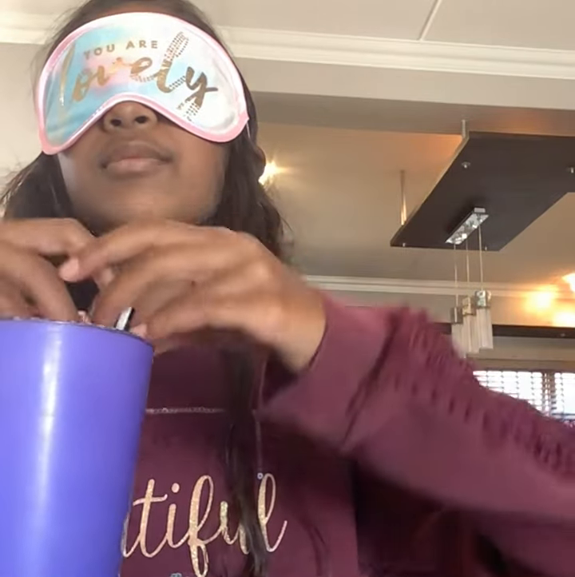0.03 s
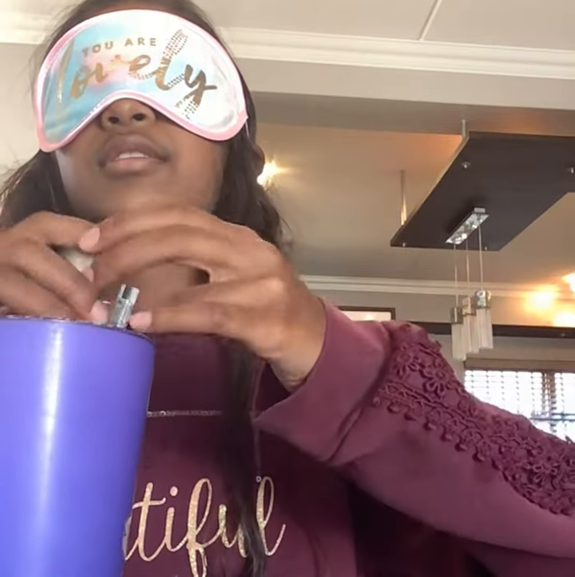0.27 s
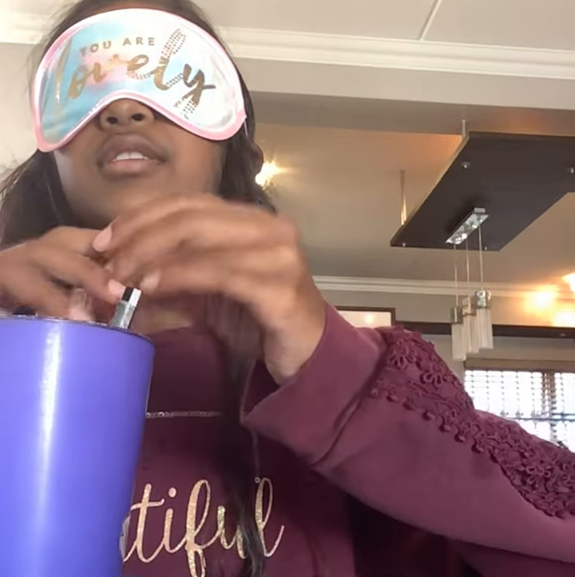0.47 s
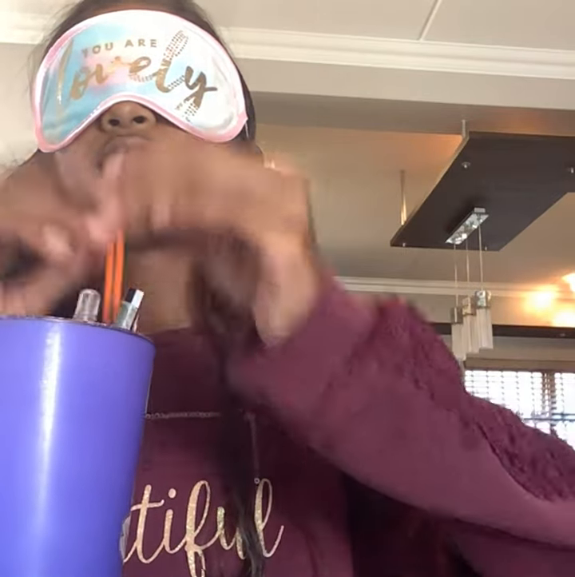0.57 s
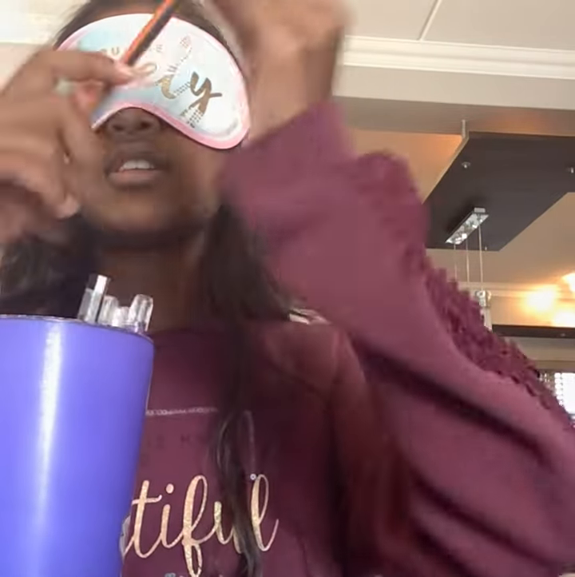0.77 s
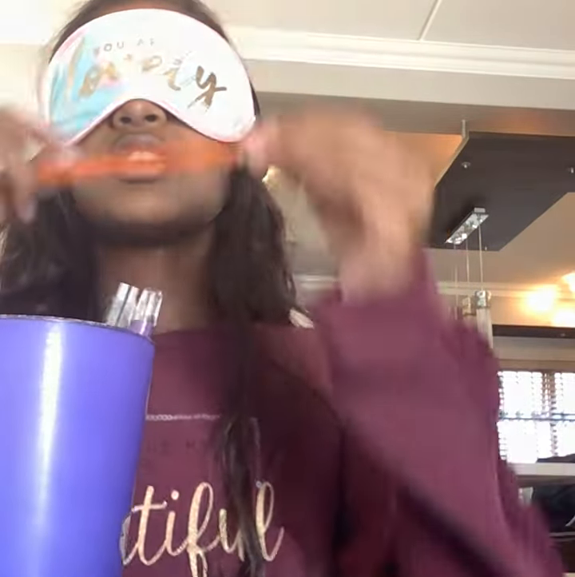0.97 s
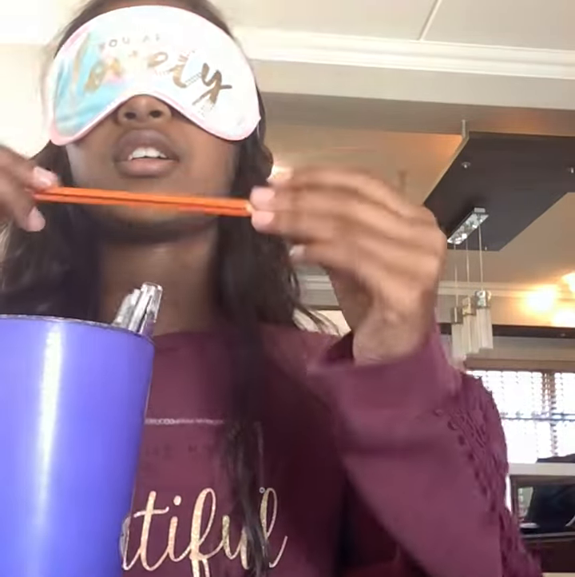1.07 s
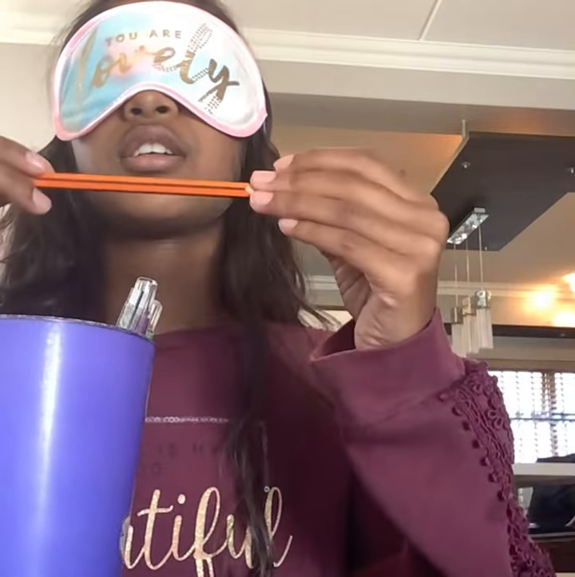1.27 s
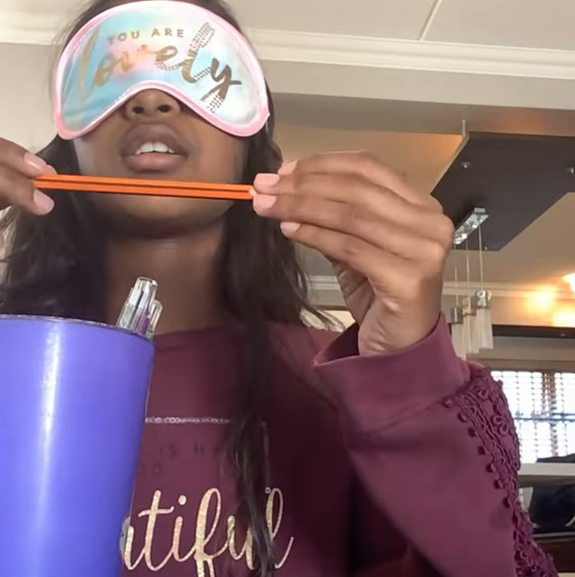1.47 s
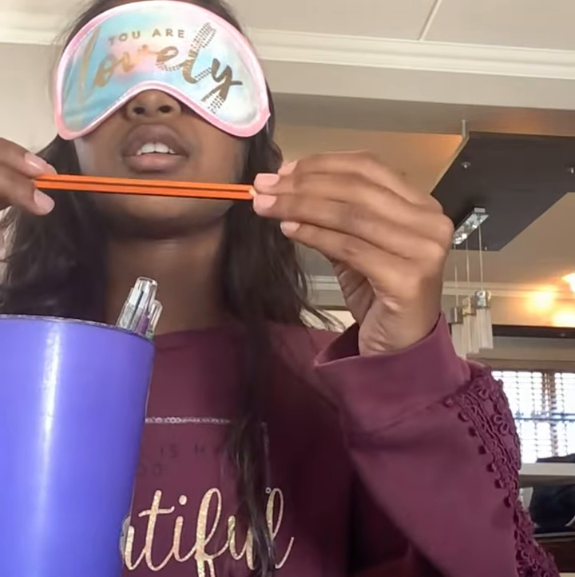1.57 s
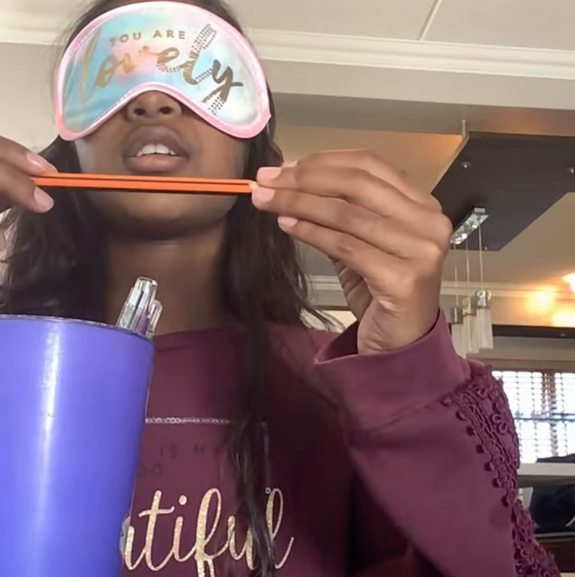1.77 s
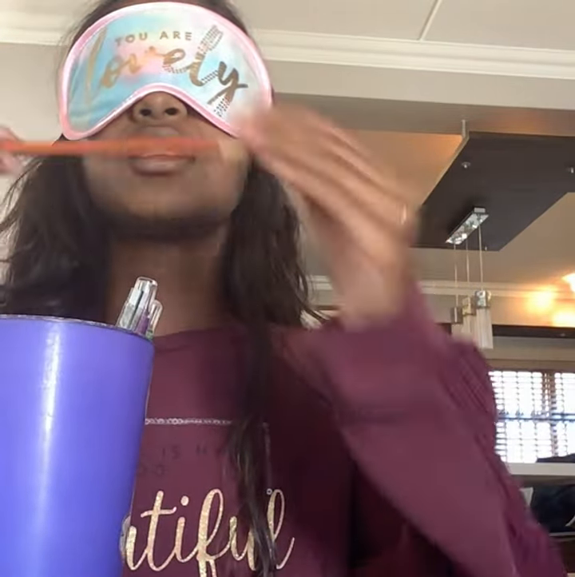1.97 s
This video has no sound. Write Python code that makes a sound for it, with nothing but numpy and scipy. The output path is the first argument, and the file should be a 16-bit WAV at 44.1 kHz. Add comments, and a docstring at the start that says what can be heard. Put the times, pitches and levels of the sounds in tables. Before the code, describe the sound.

Pens and pencils rattle in a plastic cup near the microphone, their bright clicks mixed with hollow knocks and a soft rustle of hand and sleeve. After a tiny squeak, pencils slide out along their neighbours in the loudest part of the clatter. The remaining pens settle with a couple of light ticks, and the room goes quiet apart from a small motor humming faintly.

```python
"""Pencils and pens click together as a hand picks pencils out of a plastic cup, close by in a living room.
The barrels ring in bending modes, slide and squeak on each other; two last ticks follow as they settle.
Their ends knock the cup, whose hollow booms and whose wall clatters; barrels tap its stiff rim.
Hand and arm rustle softly, and a small motor hums somewhere in the room."""
import sys
import numpy as np
from scipy import signal
from scipy.fft import rfft, irfft, next_fast_len
from scipy.io import wavfile
from scipy.ndimage import map_coordinates

SR = 44100
rng = np.random.default_rng(int(sys.argv[2]) if len(sys.argv) > 2 else 0)


def store_wav(level_fs):
    """Save 16-bit WAV to argv[1]."""
    pcm = np.round(np.clip(np.atleast_2d(level_fs), -1, 1) * 32767)
    wavfile.write(sys.argv[1], SR, pcm.T.astype(np.int16))


N = 88508

# Levels in the tables are relative.
# barrel on barrel: start_s, low_db, mid_db, high_db, favoured_hz
BARREL_CLICKS = [(0.046, -79, -52, -66, 5050), (.059, -42, -40.5, -69, 3645),
                 (0.0675, -48.5, -43.5, -54, 3645), (0.0802, -41, -43.5, -53.5, 5800),
                 (0.146, -44, -46, -56.5, 5160), (0.174, -45, -49.5, -58.5, 2510),
                 (0.184, -55, -42.5, -42, 8680), (0.2308, -63.5, -55.5, -62, 4160),
                 (0.2476, -60, -41, -47, 4160), (.2556, -55.5, -45.5, -44, 8770),
                 (0.3299, -34.5, -30.5, -33, 4380), (0.348, -33, -30.5, -39, 1685),
                 (0.38, -41.5, -46.5, -52, 6362), (.403, -57.5, -40.5, -48.5, 5150),
                 (0.4825, -37.5, -33.5, -41, 5230), (0.4892, -35.5, -20, -30.5, 4900),
                 (0.5812, -27.5, -20, -27, 3645), (.611, -39, -43, -38, 3400),
                 (0.6396, -43.5, -41.5, -45.5, 1660), (0.6919, -34, -31.5, -38, 3180),
                 (.699, -51, -36.5, -41.5, 3100), (1.092, -63, -76, -90, 3400),
                 (1.126, -59, -47, -59, 4750), (1.17, -46.5, -44.5, -58.5, 4100)]
# barrel bending modes: pitch_hz, level_db, t60_s
BARREL_MODES = [(1680.4, -2, 0.097), (2515, -13, 0.041), (2724, -10, 0.048), (3136, 3, 0.063),
                (3660, 4, .06), (4120, -9.5, .04), (4597, -5.5, 0.07), (4810, -7.5, 0.018),
                (5160, -1.5, 0.035), (5790, -5.5, 0.02), (5960, -10, 0.045), (6373, -6.5, .075),
                (6670, -7.5, 0.041), (7670, -10, .043), (7944, -6.5, 0.012), (8740, -5, .037),
                (9860, -10.5, 0.039), (10830, -10.5, .05), (12030, -8.5, .017), (13250, -19, .024)]
# contact crack: freq_hz, density_db
CRACK_SPECTRUM = [(300, -30.5), (900, -7.5), (1500, -2), (2300, -9.5), (3800, 5), (5200, 9.5), (7000, -3),
                  (9000, -0.5), (12000, -10), (16000, -16.5)]
# pen ends on the cup: start_s, boom_db, boom_hz, wall_db, thump_db, rise_s
CUP_KNOCKS = [(0.043, -49, 598, -56, -58, .001), (0.0762, -26.5, 587.7, -31, -43, 0.0043),
              (.139, -35.5, 632, -30, -32, 0.0056), (.157, -38.5, 714, -40.5, -34.5, 0.0011),
              (0.181, -39.5, 330, -46.5, -41, 0.0083), (.248, -40, 595, -46.5, -46, 0.0022),
              (.323, -42.5, 559, -37.5, -47.5, 0.0013), (0.3482, -29.5, 598, -28, -39, 0.0011),
              (.357, -29, 614.5, -31, -45, 0.0034), (.373, -32.5, 579, -43, -43.5, 0.0063),
              (0.584, -26.5, 438.6, -49, -50, 0.02), (.625, -34, 623, -45, -50, 0.026),
              (.7, -37.5, 621.4, -50.5, -43.5, 0.017), (1.005, -45.5, 608, -39.5, -66, 0.034),
              (1.171, -55, 598, -53.5, -50.5, .0012)]
# cup wall and base modes: pitch_hz, level_db, t60_s
CUP_MODES = [(430, -2.5, 0.12), (710.2, -2.5, 0.14), (852, 0.5, 0.046), (975, 0, 0.045), (1134, -3, 0.042),
             (1352, -5, 0.043), (1565, -7.5, 0.021), (1710, -5, .03)]
# thump into the holding hand: freq_hz, density_db
THUMP_SPECTRUM = [(35, -47.5), (70, -15.5), (130, -1.5), (300, -3), (500, -15), (1000, -22.5),
                  (3000, -60.5)]
# barrels on the rim: start_s, level_db
RIM_TAPS = [(.146, -42), (.3486, -36), (.4895, -44), (.581, -40), (.642, -50), (.692, -35), (1.127, -57),
            (1.171, -46)]
# rim modes: pitch_hz, level_db, t60_s
RIM_MODES = [(1103, -4.5, .04), (1203.7, -4.5, .025), (1424, -5.5, .025), (1557, 4.5, .025),
             (1830, -8, 0.13), (2026, -6, 0.053)]
# pencil drawn along its neighbours: start_s, level_db, length_s
SLIDE_STROKES = [(-.02, -56, 0.027), (.14, -55, 0.16), (.32, -47.5, 0.11), (.485, -44.5, 0.31),
                 (.99, -65.5, 0.075)]
# sliding friction: freq_hz, density_db
SLIDE_SPECTRUM = [(400, -32.5), (1650, -6), (2400, -11), (3400, -7.5), (5500, 1), (9000, 3), (12000, -5.5),
                  (16000, -7.5)]
# stick-slip notes: start_s, level_db, start_hz
PENCIL_SQUEAKS = [(0.23, -46.5, 2869), (0.248, -55, 2657), (0.254, -45.5, 2950)]
# hand rummages, then takes hold: start_s, level_db, length_s
GRIP_STROKES = [(-.02, -44, 0.72), (.98, -57.5, 0.14)]
# finger and sleeve rustle: freq_hz, density_db
RUSTLE_SPECTRUM = [(25, -51), (48, -26), (70, 2), (140, 2), (260, 1), (450, -5), (700, -0.5), (1100, -15),
                   (2200, -25), (6000, -36.5)]
# arm swings up: start_s, level_db, length_s
SWING_STROKES = [(.55, -60.5, 0.575)]
# arm rumble: freq_hz, density_db
SWING_SPECTRUM = [(70, -31.5), (125, -7), (150, 3), (200, -2.5), (260, -5), (500, -42)]
# motor tones: pitch_hz, level_db
MOTOR_TONES = [(145.8, -67), (195, -83.5), (291, -72.5), (391, -78.5), (538, -87), (586, -86)]
# still air: freq_hz, density_db
AIR_SPECTRUM = [(20, -31.5), (45, -22.5), (72, 5), (110, -2), (190, 2), (300, 0), (450, -6), (700, -18.5),
                (1200, -24.5), (3000, -24.5), (6000, -26), (12000, -28.5), (16000, -35.5)]
# room decay: freq_hz, t60_s
ROOM_DECAY = [(100, 0.99), (500, 0.27), (2000, 0.37), (5000, 0.48), (9000, 0.22), (15000, 0.31)]


def barrel_clicks(detune_ratio=0.0083, detune_above_hz=7000):
    """Hard contacts: a brief crack plus ringing barrels, levelled in three bands."""
    out, t = np.zeros(N), np.arange(SR // 2) / SR
    bands_hz = [("lowpass", 2400), ("bandpass", (2400, 7000)), ("highpass", 7000)]
    filters = [signal.butter(3, hz, kind, fs=SR, output="sos") for kind, hz in bands_hz]
    crack_decay = amp(-60 * t / 0.016) + amp(-15 - 60 * t / 0.06)
    for start_s, *bands_db, favoured_hz in BARREL_CLICKS:
        detune = detune_ratio * rng.standard_normal()  # upper modes differ per barrel
        modes = []
        for hz, db, t60_s in BARREL_MODES:
            spot_db = 7 * np.exp(-(np.log(hz / favoured_hz) / 0.11) ** 2)  # set by the struck spot
            modes.append((hz * (1 + detune * (hz > detune_above_hz)), db + spot_db, t60_s))
        crack = amp(9) * noise(CRACK_SPECTRUM, len(t)) * crack_decay
        blow = (ring(modes, t, scatter_db=6.5) + crack) * (1 - np.exp(-t / 0.00015))
        bands = [signal.sosfilt(sos, blow) for sos in filters]
        click = sum(amp(db - 3.5) * band / np.std(band[:SR // 100]) for db, band in zip(bands_db, bands))
        add(out, start_s, in_room(click, wet_db=-13.5))
    return out


def cup_knocks(boom_t60_s=0.095, thump_t60_s=0.11):
    """Pen ends hit the cup: the hollow booms, the wall clatters, the holding hand takes a thump."""
    out, t = np.zeros(N), np.arange(SR // 2) / SR
    for start_s, boom_db, boom_hz, wall_db, thump_db, rise_s in CUP_KNOCKS:
        boom = amp(boom_db + 4.5 - 60 * t / boom_t60_s) * np.sin(2 * np.pi * boom_hz * t)
        wall = amp(wall_db - 2) * ring(CUP_MODES, t, scatter_db=4)
        thump = amp(thump_db - 60 * t / thump_t60_s) * noise(THUMP_SPECTRUM, len(t))
        knock = (boom + wall + thump) * np.minimum(t / rise_s, 1)
        add(out, start_s, in_room(knock, wet_db=-5))
    return out


def rim_taps(rise_s=0.00036):
    """A barrel falls against the stiff rim, which rings briefly."""
    out, t = np.zeros(N), np.arange(SR // 2) / SR
    for start_s, level_db in RIM_TAPS:
        tap = amp(level_db) * ring(RIM_MODES, t, scatter_db=4.5) * (1 - np.exp(-t / rise_s))
        add(out, start_s, in_room(tap, wet_db=-20))
    return out


def barrel_slides(width_ratio=0.012, treble_hz=4200, brighten_db_per_db=0.72):
    """Countless tiny slips keep the barrel modes singing; a gentler slide is duller."""
    def response(hz):
        body = sum(amp(db) * resonance(hz, mode_hz, width_ratio * mode_hz)
                   for mode_hz, db, _ in BARREL_MODES)
        return (0.08 + body) * amp(along(SLIDE_SPECTRUM, hz))

    slips = rng.standard_normal(N) * amp(1.9 * wobble(rate_hz=54))
    rub = unit(filtered(slips, response))
    low = filtered(rub, lambda hz: 1 / (1 + (hz / treble_hz) ** 6))
    force = strokes(SLIDE_STROKES, attack_s=0.018, sag_db_per_s=49.5, release_db_per_s=197)
    treble = (rub - low) * (force / force.max()) ** brighten_db_per_db
    return in_room(force * (low + treble), wet_db=-17)


def pencil_squeaks(glide_s=0.008, rise_s=0.00028, t60_s=0.055):
    """Stick-slip: short, rough notes that sink as the pencil slows."""
    out, t = np.zeros(N), np.arange(SR // 4) / SR
    for start_s, level_db, start_hz in PENCIL_SQUEAKS:
        jitter = 0.075 * wobble(rate_hz=900)[:len(t)]
        pitch_hz = start_hz * (1 - 0.19 * (1 - np.exp(-t / glide_s)) + jitter)
        envelope = amp(level_db + 4 - 60 * t / t60_s) * (1 - np.exp(-t / rise_s))
        note = envelope * np.sin(2 * np.pi * np.cumsum(pitch_hz) / SR)
        add(out, start_s, in_room(note, wet_db=-11))
    return out


def arm_rustle():
    """Fingers and sleeve brush the cup unevenly; the swinging arm adds a low rumble."""
    grip = strokes(GRIP_STROKES, attack_s=0.09, sag_db_per_s=10, release_db_per_s=81)
    swing = strokes(SWING_STROKES, attack_s=0.11, sag_db_per_s=4, release_db_per_s=150)
    brush = unit(noise(RUSTLE_SPECTRUM, N) * amp(2.7 * wobble(rate_hz=30))) * grip
    rumble = noise(SWING_SPECTRUM, N) * swing
    return in_room(brush + rumble, wet_db=-11)


def motor_hum():
    """Small motor: tones slightly unsteady in level and phase."""
    out, t = np.zeros(N), np.arange(N) / SR
    for pitch_hz, level_db in MOTOR_TONES:
        peak = np.sqrt(2) * amp(level_db + 1.1 * wobble(rate_hz=5.7))
        drift_rad = 0.68 * wobble(rate_hz=15)
        out += peak * np.sin(2 * np.pi * pitch_hz * t + drift_rad)
    return out


def room_air(level_db=-67.5):
    """Still air: faint, low, steady noise."""
    return amp(level_db) * noise(AIR_SPECTRUM, N)


def in_room(x, wet_db):
    """Direct sound plus a diffuse tail that lasts longest in the bass."""
    hz, t, spectra = signal.stft(rng.standard_normal(SR // 2), SR, nperseg=256)
    decay = amp(-60 * t / along(ROOM_DECAY, hz)[:, None])
    tail = signal.istft(spectra * decay, SR, nperseg=256)[1]
    tail *= 1 - np.exp(-np.arange(len(tail)) / SR / 0.0017)
    return x + amp(wet_db) * signal.fftconvolve(x, tail / np.linalg.norm(tail))[:len(x)]


def ring(modes, t, scatter_db):
    """Damped modes; each blow lands on a new spot and weights them anew."""
    hz, db, t60_s = np.transpose(modes)[:, :, None]
    gain = amp(db + scatter_db * rng.standard_normal(db.shape) - 60 * t / t60_s)
    return np.sum(gain * np.sin(2 * np.pi * (hz * t + rng.random(hz.shape))), axis=0)


def resonance(hz, mode_hz, width_hz):
    """Complex band-pass response of one mode."""
    return 1j * hz * width_hz / (mode_hz ** 2 - hz ** 2 + 1j * hz * width_hz)


def strokes(rows, attack_s, sag_db_per_s, release_db_per_s):
    """Gain of movements: each swells, sags, then dies away."""
    start_s, level_db, length_s = np.transpose(rows)[:, :, None]
    age_s = np.maximum(np.arange(N) / SR - start_s, 0)
    fade_db = sag_db_per_s * age_s + release_db_per_s * np.maximum(age_s - length_s, 0)
    return np.linalg.norm(np.minimum(age_s / attack_s, 1) * amp(level_db - fade_db), axis=0)


def noise(spectrum, size):
    """Coloured noise, rms 1."""
    return unit(filtered(rng.standard_normal(size), lambda hz: amp(along(spectrum, hz))))


def wobble(rate_hz):
    """Smooth random curve, rate_hz knots a second."""
    return map_coordinates(rng.standard_normal(400), [np.arange(N) * rate_hz / SR], mode="wrap")


def filtered(x, response):
    """Apply a frequency response."""
    size = next_fast_len(len(x) + 8192)
    return irfft(rfft(x, size) * response(np.fft.rfftfreq(size, 1 / SR)), size)[:len(x)]


def along(points, hz):
    """Interpolate on a log frequency axis."""
    knots_hz, values = np.transpose(points)
    return np.interp(np.log(hz + 1), np.log(knots_hz + 1), values)


def add(track, start_s, sound):
    """Mix in at start_s."""
    start = max(round(start_s * SR), 0)
    track[start:start + len(sound)] += sound[:N - start]


def amp(db):
    """Decibels to gain."""
    return 10 ** (np.asarray(db) / 20)


def unit(x):
    """Scale to rms 1."""
    return x / np.sqrt(np.mean(x ** 2) + 1e-20)


def scene():
    """All sources, mono."""
    impacts = barrel_clicks() + rim_taps() + cup_knocks()
    friction = pencil_squeaks() + barrel_slides() + arm_rustle()
    return (impacts + friction + motor_hum() + room_air())[None]


def record(dry):
    """Cut the deepest bass and the top treble."""
    bottom_hz, top_hz = 58, 16100
    thin = signal.sosfilt(signal.butter(4, bottom_hz, "highpass", fs=SR, output="sos"), dry)
    return np.array([filtered(channel, lambda hz: 1 / (1 + (hz / top_hz) ** 120)) for channel in thin])


dry = scene()
out = record(dry)
store_wav(out)
```